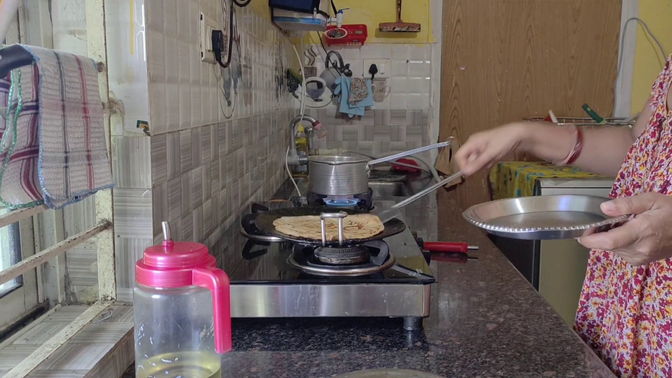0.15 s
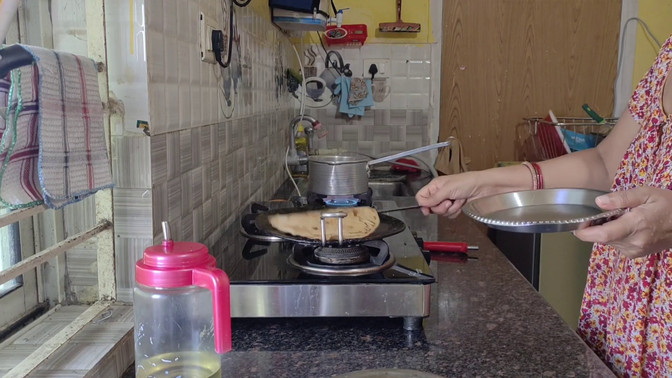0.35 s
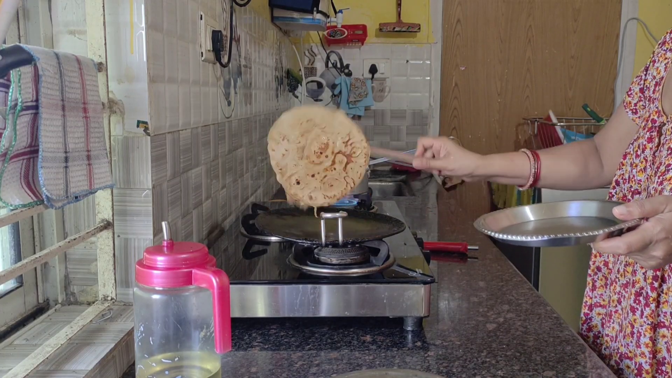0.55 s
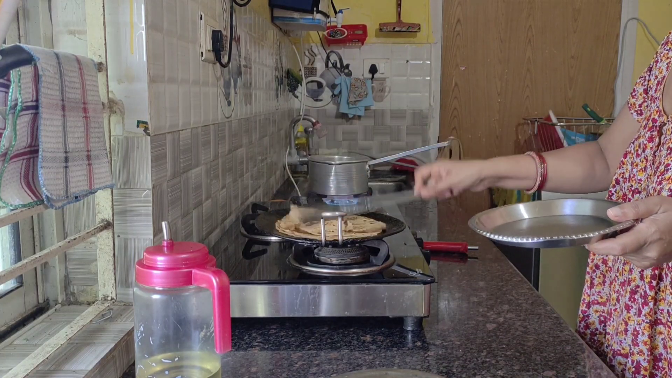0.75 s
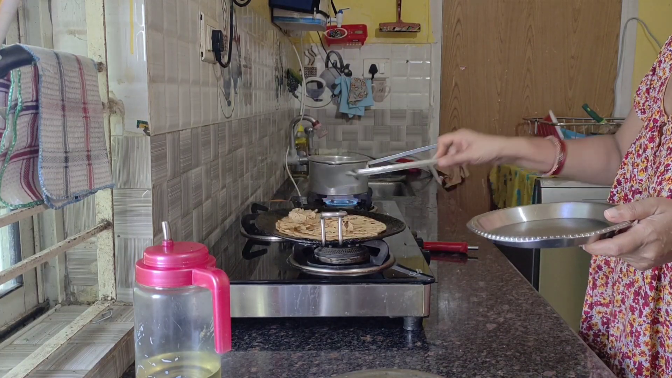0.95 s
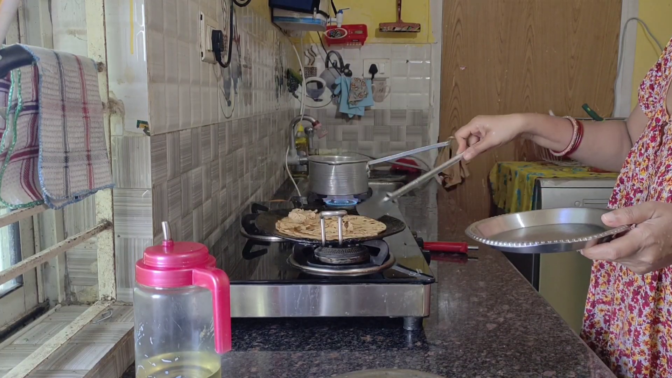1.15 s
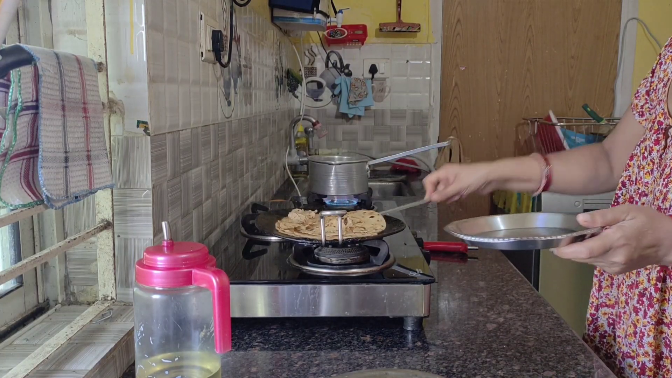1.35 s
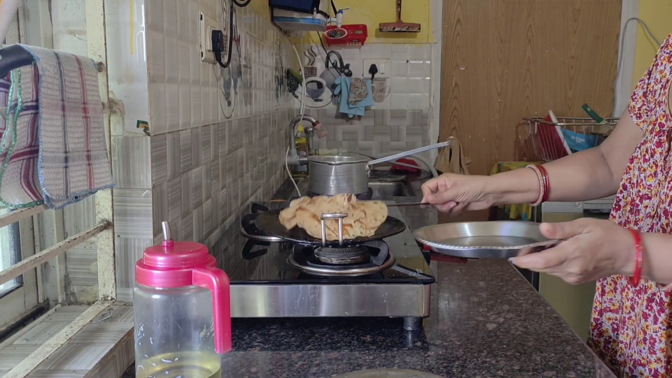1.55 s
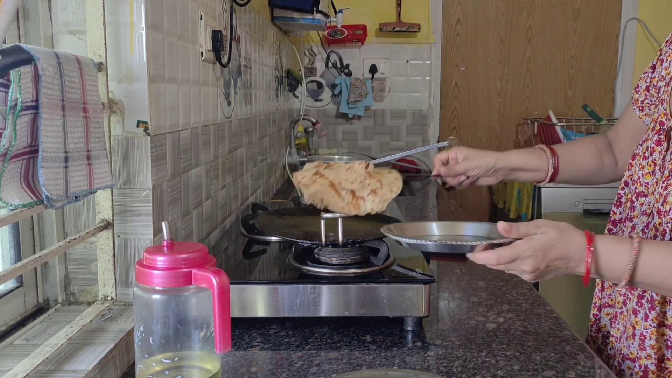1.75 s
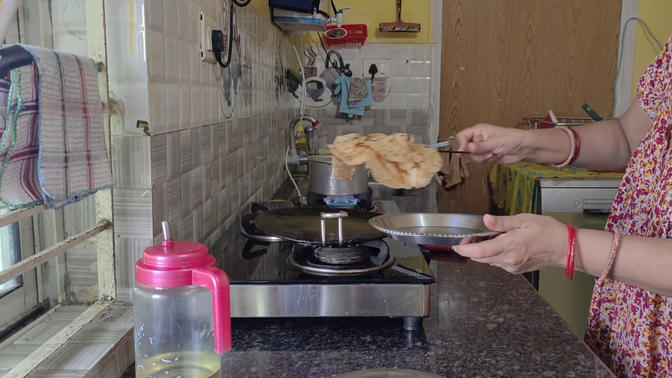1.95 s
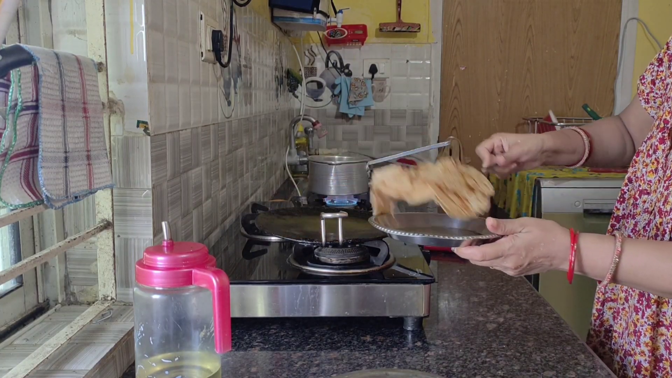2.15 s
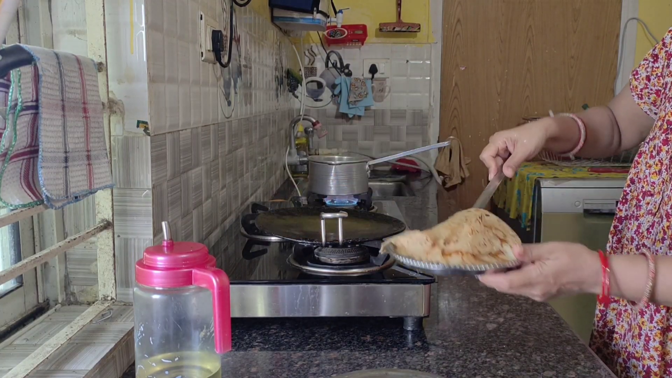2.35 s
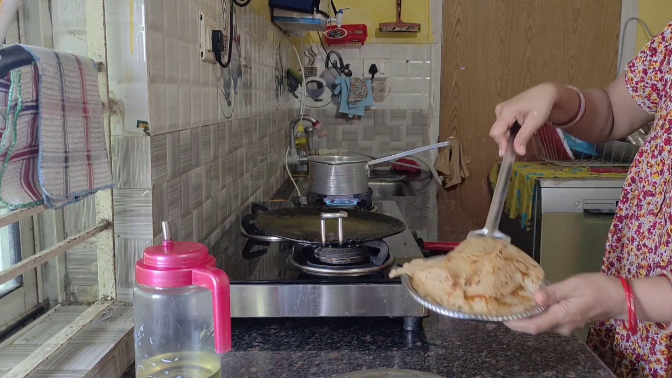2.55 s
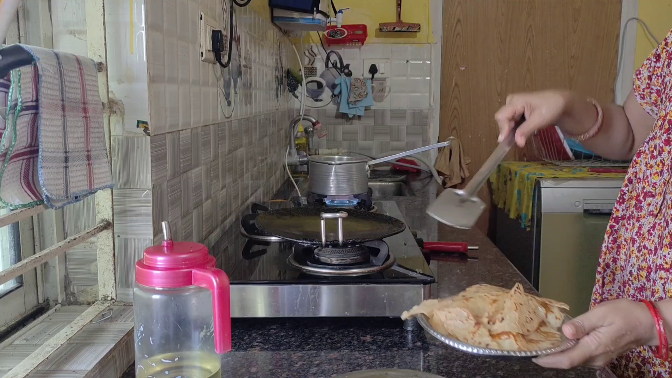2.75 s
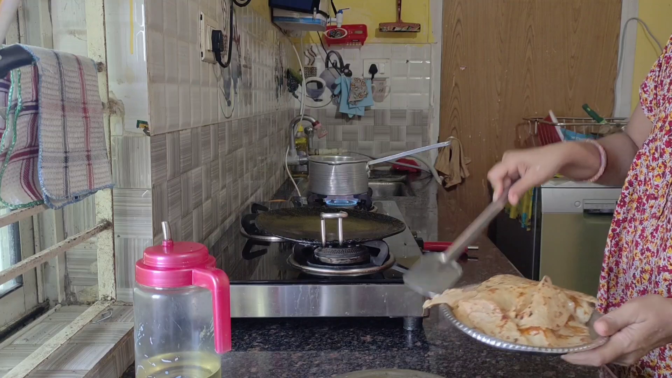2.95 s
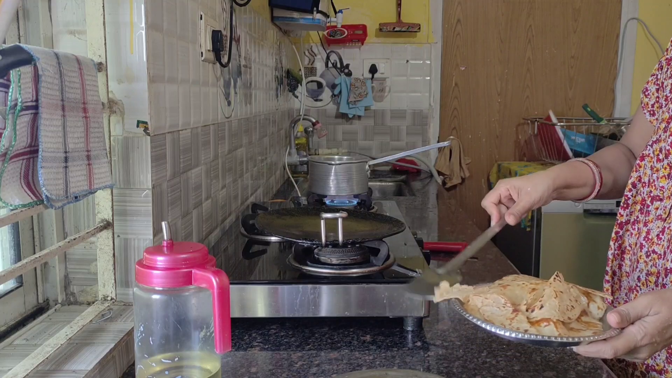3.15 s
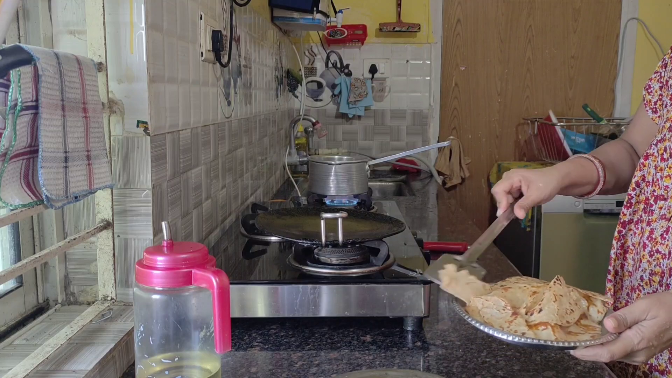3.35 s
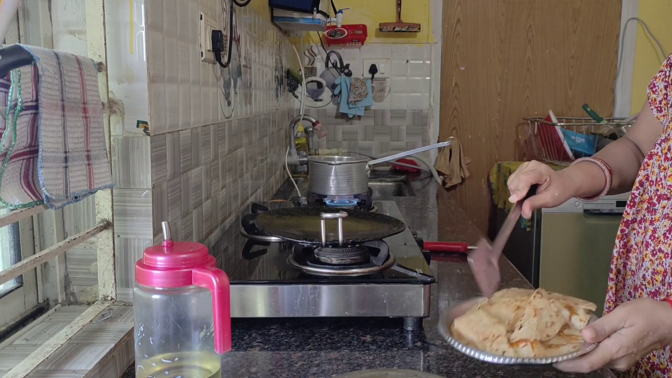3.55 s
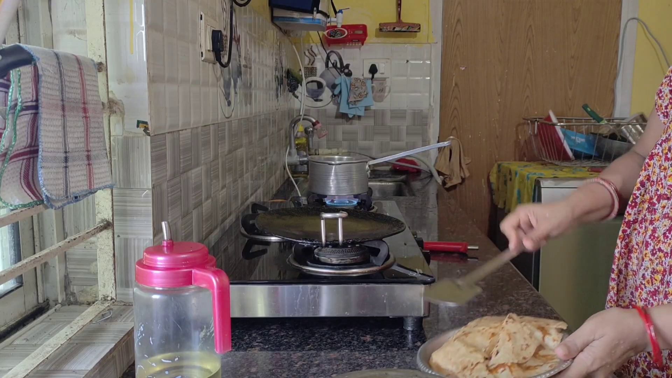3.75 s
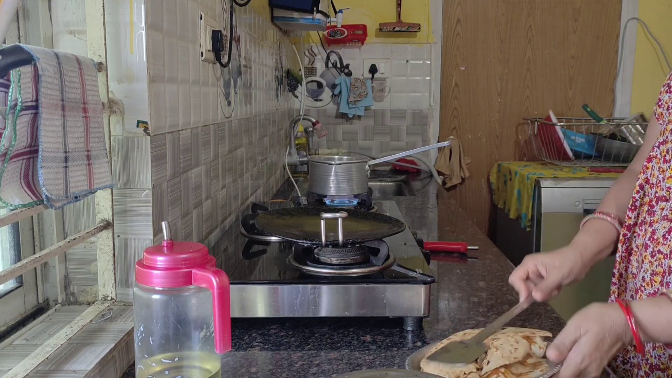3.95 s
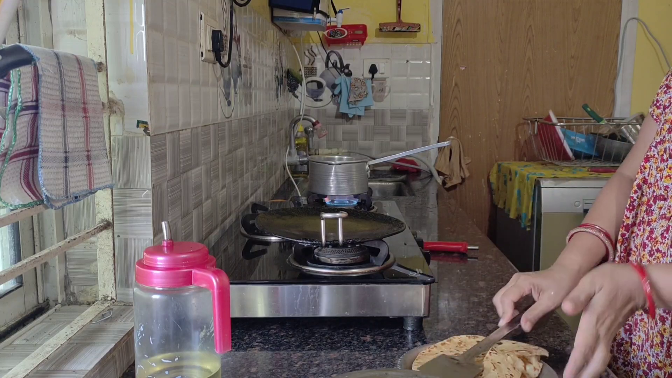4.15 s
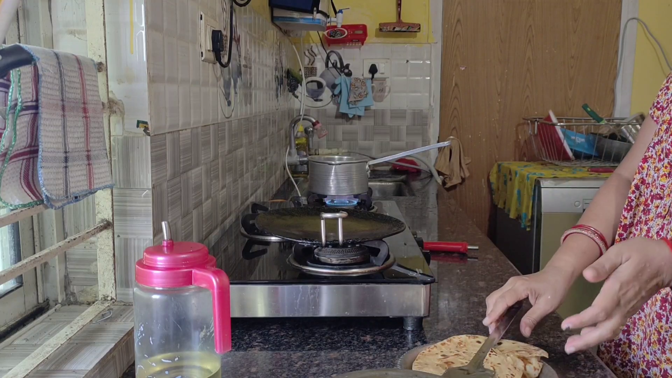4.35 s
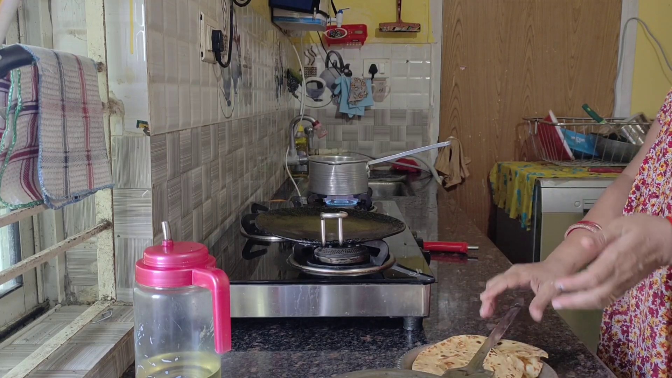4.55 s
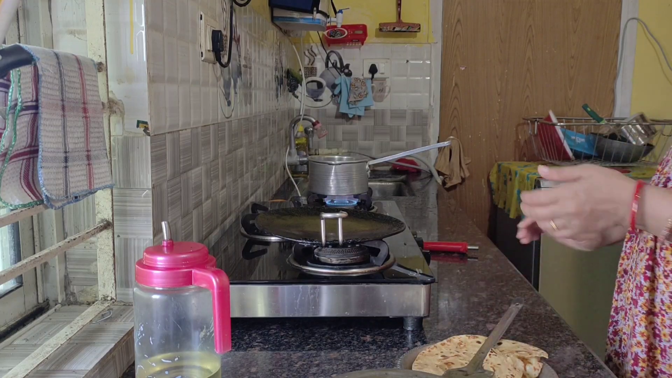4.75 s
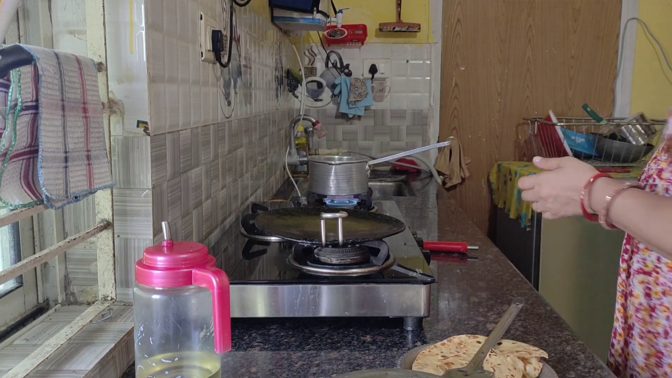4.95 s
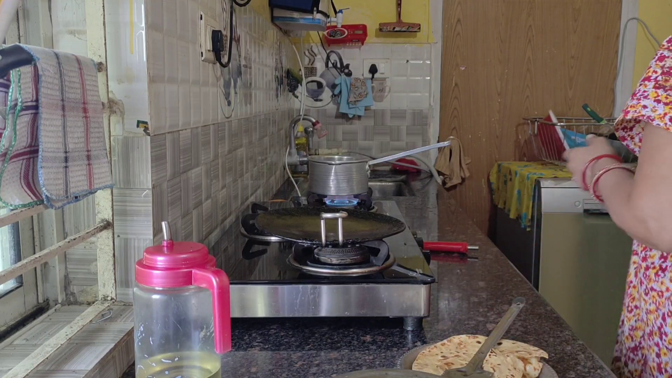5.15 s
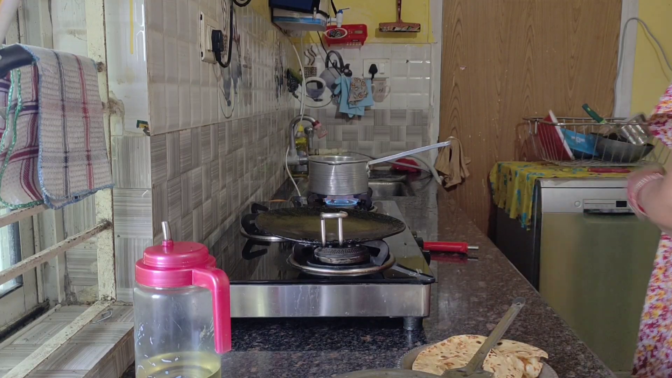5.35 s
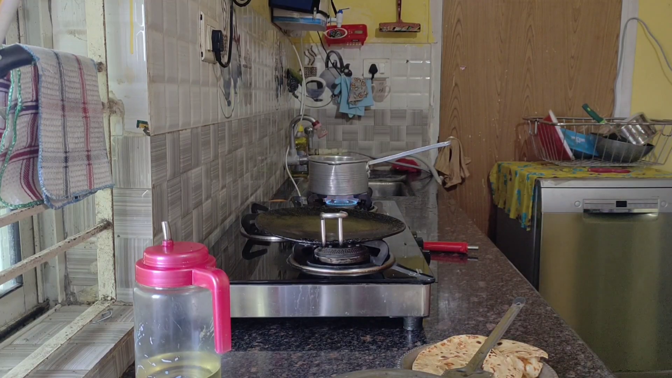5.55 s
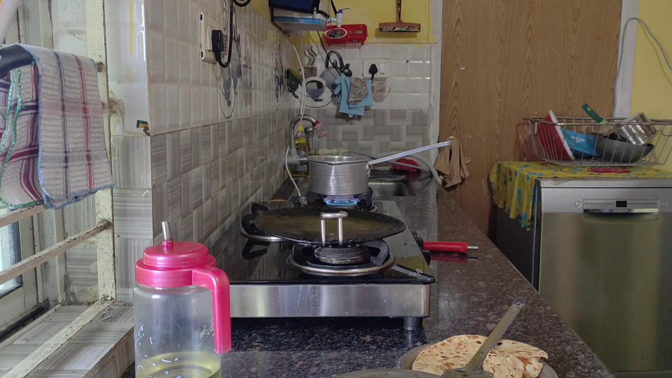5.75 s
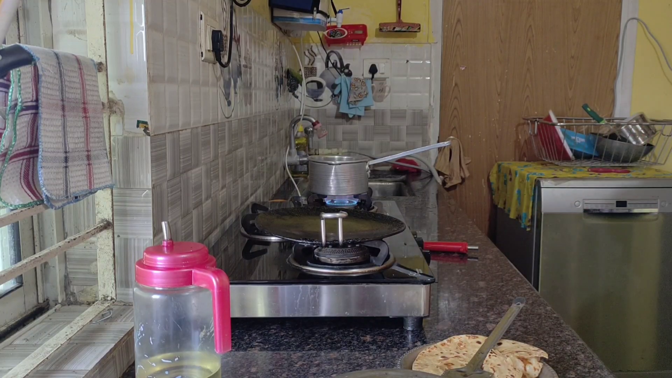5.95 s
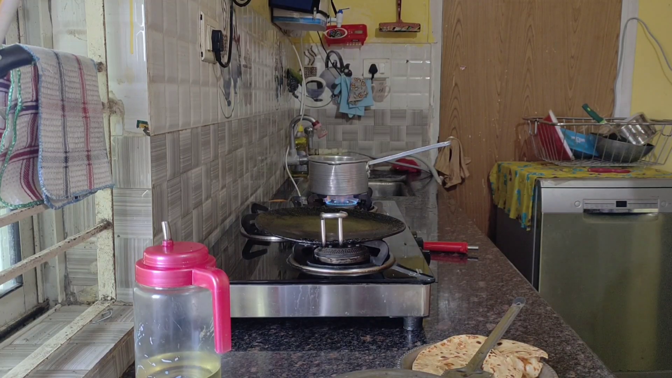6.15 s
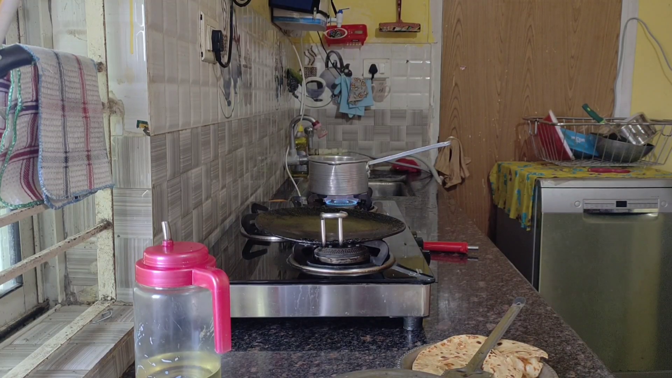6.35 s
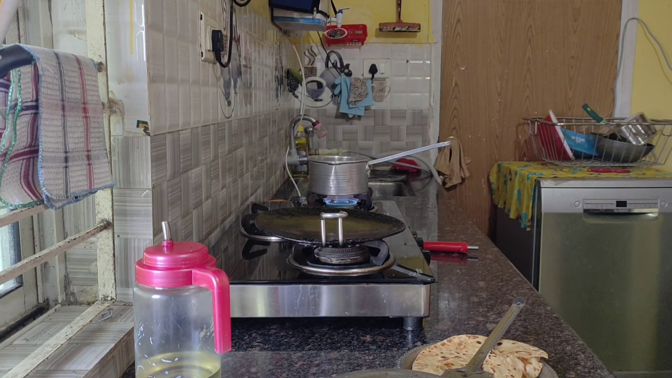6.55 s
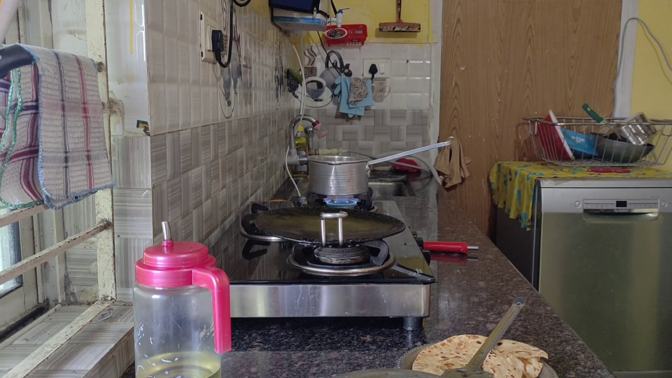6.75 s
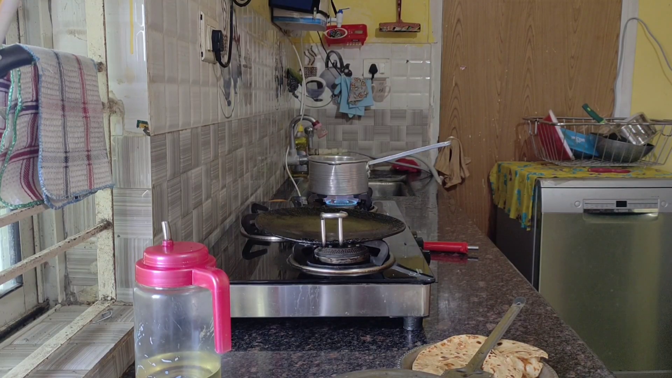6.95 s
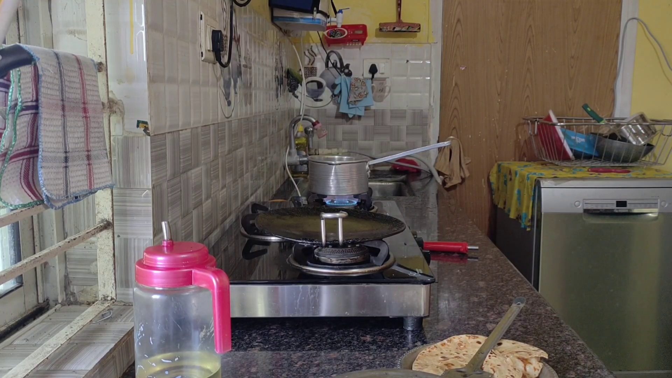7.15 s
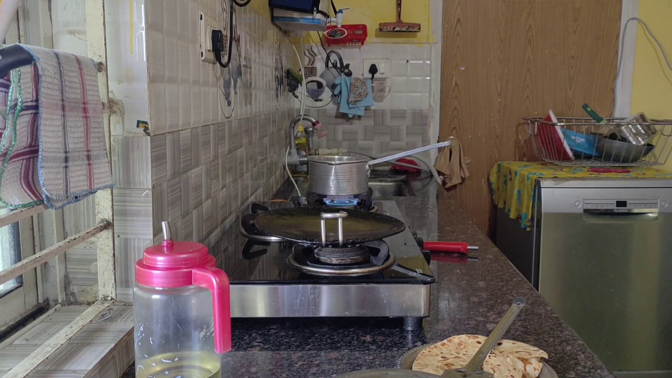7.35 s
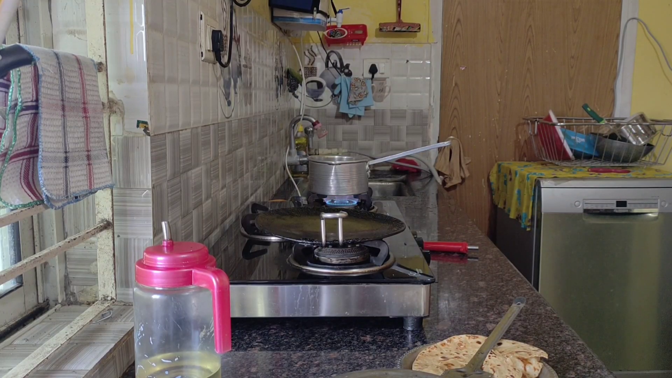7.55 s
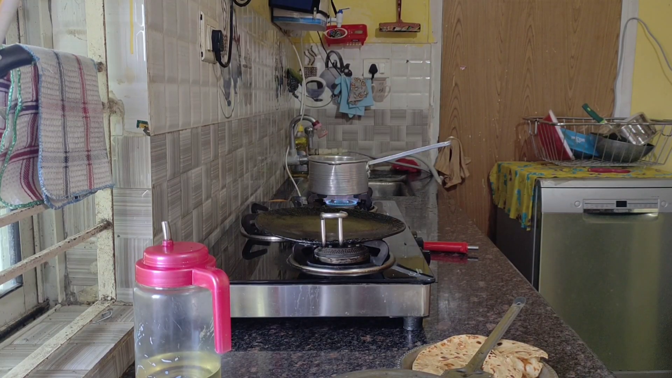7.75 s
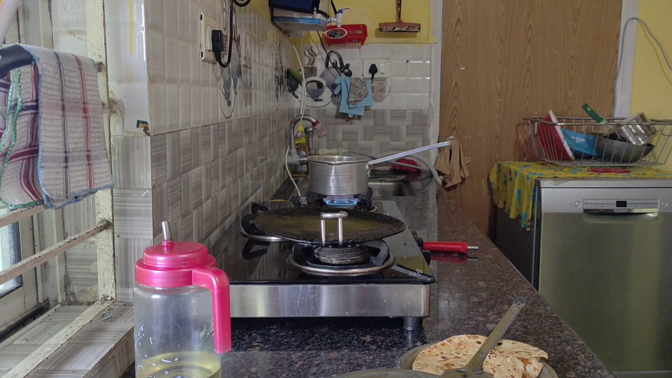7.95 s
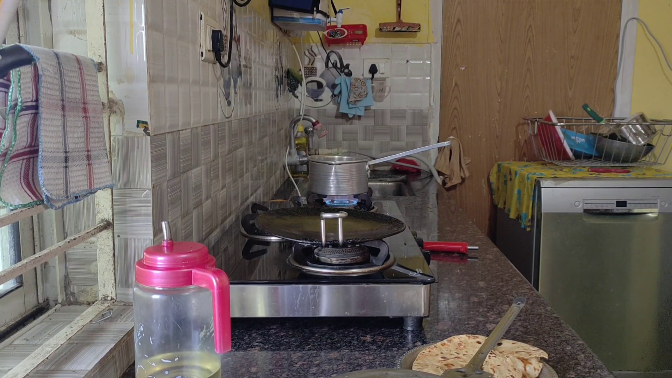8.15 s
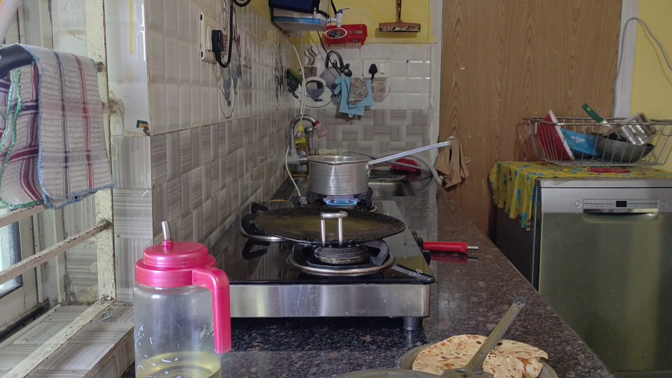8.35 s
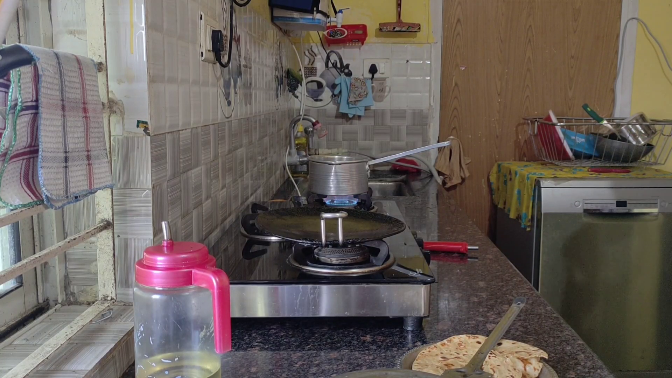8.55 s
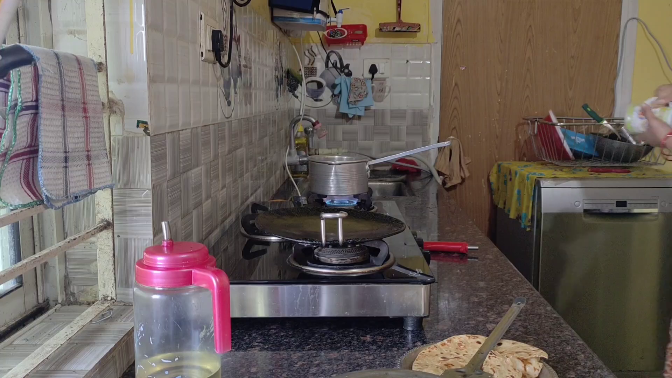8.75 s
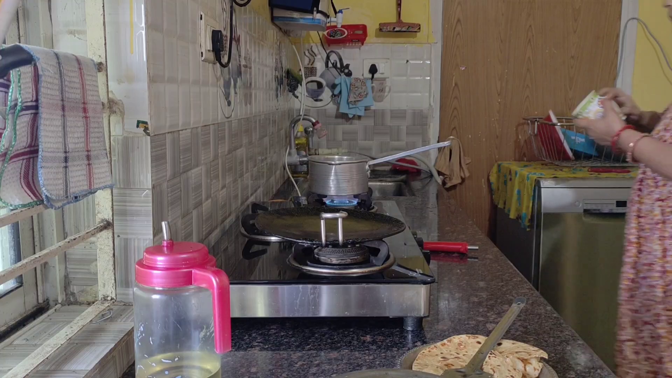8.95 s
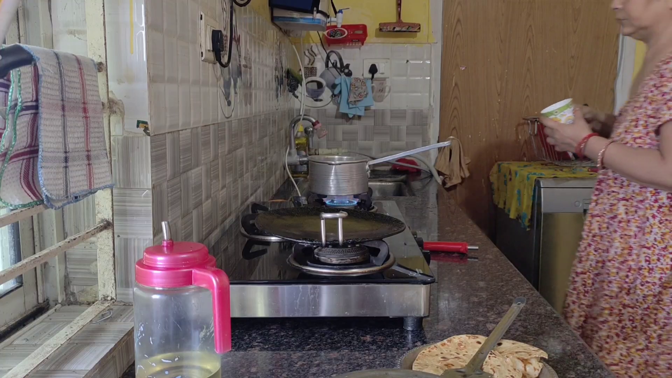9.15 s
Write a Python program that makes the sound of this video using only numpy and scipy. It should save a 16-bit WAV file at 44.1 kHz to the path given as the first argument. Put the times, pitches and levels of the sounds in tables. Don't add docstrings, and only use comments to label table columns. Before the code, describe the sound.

Close in a small tiled kitchen, a steel spatula scrapes and knocks on an iron griddle, with one sharp clack early. It clinks on a thin plate, then the plate lands on the stone counter with a double clatter. Slippers shuffle away, a lid knocks out of sight, a steel cup rings twice, and shuffling returns. Fridge hum and gas hiss continue; stereo microphones stand back and pick up much of the room.

```python
import sys
import numpy as np
from scipy import signal
from scipy.fft import rfft, irfft, next_fast_len
from scipy.io import wavfile
from scipy.ndimage import map_coordinates

SR = 44100
rng = np.random.default_rng(int(sys.argv[2]) if len(sys.argv) > 2 else 0)


def gain_from_db(level_db):
    decades = np.asarray(level_db, float) / 20
    return 10 ** decades


def store_wav(level_fs):
    pcm = np.round(np.clip(np.atleast_2d(level_fs), -1, 1) * 32767)
    wavfile.write(sys.argv[1], SR, pcm.T.astype(np.int16))


N = 406161

# start_s, clack_db, heft_db (knock re clack), direct_click (x room)
GRIDDLE_TAPS = [(.015, -30.5, -36, 2.7), (.146, -46.5, 13, 9.5), (.5, -38, 9, 3), (.293, -34, -20, 5),
                (.518, -41, -20, 4.054), (.565, -50, 17.5, 4.68), (.828, -26, 4, 5), (.8512, -12, -22, 11),
                (.9294, -42, 10.5, 8), (.966, -32.5, 16, 13), (1.045, -43, 18.5, 8), (1.079, -29.5, 3, 9.3),
                (1.212, -52, 21.5, 5.5), (1.231, -19, -2.5, 11.04), (1.376, -44, 15, 5.8),
                (1.407, -25, -11, 5), (1.585, -36, 9.5, 4.09), (1.61, -35.5, -6, 5), (1.669, -49, 17, 4),
                (1.735, -55, 15, 3)]
PLATE_TAPS = [
    (1.904, -60.5, -39, 5),
    (2.4735, -24, -3, 6.5),
    (2.6747, -28, -23, 7),
    (3.585, -50, -14.5, 2.1),
]
# full_pressure_s, rasp_db, rise_s (over 30 dB), hold_s, heft_db (knock re rasp)
SLIDES = [(.045, -43.5, 0.3, 0.031, -49), (.25, -48, .08, .04, -8), (.294, -35, .012, .03, -25),
          (.343, -32, 0.1, 0.008, -21.5), (.375, -33, .06, .035, -20), (.53, -52, 0.3068, 0.04487, -10),
          (.82, -46.5, 0.14, 0.013, -32), (.87, -45, 0.015, 0.044, 6), (1.0, -61, 0.02, 0.043, 10.5),
          (1.36, -39, .1, .04, -16), (1.408, -30, 0.015, 0.02, -16), (1.46, -34.5, .07, .02, -16),
          (1.6, -50, .06, 0.043, -2), (2.52, -42.5, 0.115, 0.13357, -54), (2.69, -52, .08, 0.013, -28)]
# start_s, clack_db, thump_db (re clack), sizzle_db (re clack), rattle_s
SET_DOWN = [
    (3.931, -32, -10, -12, .006),
    (3.939, -6.5, -23, -5, 0.016),
    (3.966, -11, -25, -6, .006),
    (4.2161, -6.5, -29.5, -8, 0.017),
    (4.2255, -9.5, -8.5, -1, 0.017),
]
# start_s, clack_db, thump_db, knock_db (both re clack), rattle_s
BLOWS = [(1.264, -40.5, 20.5, -10.5, 0.02587), (5.024, -35, 0.5, -23, 0.03), (5.4935, -37, -0.5, -6, 0.02),
         (5.678, -34.5, -29.5, -1, 0.0237), (6.384, -34, 0, -3, .008), (6.394, -21, -8, -5, 0.012),
         (6.6793, -24, -5, -5, 0.01698), (6.737, -33.5, 11, 3.5, 0.014), (6.819, -32.5, 9, -1, .012),
         (6.8594, -39, 21, -26, 0.036), (7.716, -32, 0, -6, .01), (7.725, -23, 6, -1, 0.05),
         (9.12, -29.5, 3, 4.5, 0.011)]
# full_pressure_s, rasp_db, rise_s (over 30 dB), hold_s, heft_db (knock re rasp)
SHUFFLES = [(3.1, -68, .3, .3, -3), (5.25, -66, .2, .15, -6), (6.155, -44, .05, .02, -14),
            (3.56, -68, .15, 0.1882, -3), (5.05, -60.5, .05, 0.12, -6), (5.52, -53, 0.22, 0.13, -16),
            (5.68, -33, 0.17, 0.0056, -8), (6.01, -47, 0.054, 0.028, -56), (6.04, -43, 0.08, 0.09, -12.5),
            (6.46, -56, .05, 0.056, -5), (6.56, -64.5, .1, 0.12, 1), (6.85, -48.5, .1, 0.076, -30),
            (7.06, -50.5, 0.24, 0.028, -23), (7.26, -41.5, 0.17, 0.026, -15), (7.33, -49, .1, 0.088, 0),
            (7.92, -46, 0.087, 0.041, -12), (8.01, -51, .06, 0.051, -12), (8.31, -63, 0.3227, 0.023, -3),
            (8.38, -55, .03, 0.034, -24), (8.43, -40.5, 0.11, 0.081, -12.5),
            (8.85, -50.5, 0.063, 0.039, -38), (8.9, -46, 0.16, 0.093, -14.5),
            (9.02, -44.5, 0.026, .07, -26), (9.135, -44, 0.0639, 0.004, -7.5)]

# pitch_hz, t60_s, then level_db struck on the side, on the rim, settling on its base
CUP_HZ = [232, 1157, 1278, 1949, 2182, 2440, 3110, 3755, 5220, 5599, 6342, 6655, 6966, 7477, 7936, 8140,
          9238, 10430, 12490, 13320, 13750]
CUP_T60 = [.6, 0.56, .3, 0.7, 0.32, 0.38, .5, 0.33, 0.28, .3, 0.23, 0.26, .22, 0.3006, .3, 0.1267, 0.051,
           0.23, 0.23, .22, 0.14]
SIDE_DB = [-26, -16, -9, -12, -18, -6, -10, -3, 1, -7, -12, -2, -3, -11.5, 0, -6, 3, -5, -9, -10, -7]
RIM_DB = [-20, -12, -9, -39.5, -7.5, -10, -1, -2, -7, -3.5, -6, -9, -31, -14.5, -18, -6.5, -3, -22.5, -28,
          -24, -24]
BASE_DB = [-20, 2, -10, -30, -6, -9, -2, -1, -7, -7, -9, -9, -30, -15, -18, -14, -14, -22, -28, -24, -24]
CUP_SIDE = np.transpose([CUP_HZ, SIDE_DB, CUP_T60])
CUP_RIM = np.transpose([CUP_HZ, RIM_DB, CUP_T60])
CUP_BASE = np.transpose([CUP_HZ, BASE_DB, CUP_T60])
# pitch_hz, level_db, t60_s
PLATE = [(480, -4, .07), (748, 0, .09), (1256, -8, .08), (1534, -9, .1), (1873, -1, .1), (2800, 0, .07),
         (3015, -6, .15), (3720, -8, .12), (5582, -12, .15), (7052, -8, .15), (8753, -11, .15),
         (10020, -8, .14), (10990, -6, .15), (12690, -9, .1)]
# pitch_hz, level_db, t60_s
RESTRIKE = [(808, -4, .08), (2804, -1, .12), (3240, 1, .04), (4340, -6, .06), (5030, -10, .25),
            (5300, -9, .06), (7480, -7, .06), (8834, -10, .07), (11150, -8, .06)]
# pitch_hz, level_db, t60_s
GRIDDLE = [(2288, -10, .1), (3295, -8, .08), (4172, -7, .2), (4716, -8, .2), (5868, -1, .12),
           (6250, -7, .1), (7000, -8, .08), (7779, -10, .1), (8312, -3, .07), (10340, -10, .1),
           (10980, -12, .09), (12100, -18, .1)]
# pitch_hz, level_db, t60_s
LID = [(1400, -9, .1), (2970, -6, .1), (3327, 0, .17), (3490, -2, .06), (4242, -9, .2), (5604, -4, .15),
       (6115, -8, .16), (7058, -9, .2), (7763, -4, .11), (8629, -13, .2), (9981, -14, .2), (10720, -11, .2),
       (11280, -13, .11), (13230, -22, .15)]
# pitch_hz, level_db, t60_s
SPATULA = [ (2780, -14, .2), (3025, -2, .3), (3440, 4, .05), (3620, 0, .04), (4366, -6, .3), (5443, -4, .3),
           (6200, -10, .2), (6729, -7, .11), (7418, -6, .24), (7967, -12, .29), (8915, -10, .3),
           (11130, -14, .3), (11550, -12, .3), (14150, -16, .2)]
# pitch_hz, level_db, t60_s
SEATING = [(830, -1, .1), (1900, -8, .08), (3036, -2, .25), (3400, 2, .15), (4300, -8, .15),
           (6099, -13, .2), (6578, -12, .12), (7800, -17, .15)]
# pitch_hz, level_db, t60_s
STAND = [(420, -3.5, 0.7), (543, -5, 0.53), (666, -3.5, 0.68), (1255.4, -0.5, 0.067), (1390, -22.5, 0.095)]
# start_s, object, level_db, rattle_s, grip_t60_s (longest the grip allows)
RINGS = [(0.015, SPATULA, -46, .06, .06), (0.15, STAND, -41, 0.03, .6), (0.502, STAND, -48, .0075, .091),
         (.519, GRIDDLE, -48, .005, .06), (1.079, GRIDDLE, -40, 0.005, 0.061),
         (1.2315, GRIDDLE, -30.5, 0.0027, .12), (1.609, GRIDDLE, -40, 0.00735, 0.08),
         (2.279, SPATULA, -33, .02, .05), (2.325, SPATULA, -43, 0.04, 0.07),
         (2.4725, PLATE, -20, 0.012, 0.09), (2.675, RESTRIKE, -27, 0.03, 0.25),
         (3.939, SEATING, -20, .018, 0.2), (3.966, SEATING, -24, .006, .2), (6.679, LID, -24, 0.022, 0.12),
         (7.099, CUP_SIDE, -20, 0.04, .35), (7.16, CUP_SIDE, -26, .04, .3),
         (7.762, CUP_RIM, -16.5, 0.012, 0.33), (7.776, CUP_BASE, -17, .05, .33)]

# pitch_hz, level_db (per Hz)
TAP = [(180, -48), (300, -20.5), (801, -4), (1170, -13.5), (2480, -2), (3130, -1.5), (6200, -19.5),
       (11300, -8), (14700, -10), (16000, -32)]
# pitch_hz, level_db (per Hz)
RASP = [(180, -46.5), (300, -43.5), (366, -12), (1210, -6), (1320, -2.5), (3700, -2), (4440, -12),
        (5160, -7.5), (6100, -9), (12100, -6.5), (16000, -6.5)]
# pitch_hz, level_db (per Hz)
CLACK = [(71, -44), (120, -8.5), (473, -26.5), (742, -13), (1620, -13), (3110, -6), (4780, -23.5),
         (16000, -24)]
# pitch_hz, level_db (per Hz)
SCUFF = [(71, -29), (120, -7), (177, -1), (445, -23), (805, -6), (892, -13.5), (1340, -11), (2750, -11),
         (10200, -23), (11800, -19.5), (16000, -24.5)]
# pitch_hz, level_db (per Hz)
HUM = [(15, -51.5), (25, -29), (69, -12), (80, -12), (102, -1.5), (130, 0.5), (267, -13.5), (295, -24.5),
       (406, -23), (448, -30.5), (700, -37.5), (910, -76), (1540, -120)]
# pitch_hz, level_db (per Hz)
HISS = [(180, -15), (300, -11.5), (440, -9), (614, -9.5), (678, -6.5), (1080, -14), (2140, -19.5),
        (2250, -17), (2650, -15.5), (4230, -25), (6850, -24.5), (8790, -27), (10400, -18.5), (11900, -26.5),
        (16000, -23.5)]
# pitch_hz, width_hz, level_db
PAN = [(760, 160, 5), (2450, 300, -3), (3100, 350, -1), (5850, 150, 0), (7000, 200, -3)]
# pitch_hz, width_hz, level_db
IRON = [(732, 157.08, 5), (1730, 44, -9), (2100, 42, -2), (3140, 130, -3.5), (3767, 72, 0), (5100, 61, 4.5),
        (5400, 50, 8), (6900, 120, 6), (7770, 75, 5), (2710, 105, -5)]
# pitch_hz, width_hz, level_db
STONE = [(778, 97, 12), (3165, 170, 6), (3320, 180, 5), (4305, 140, 5.5), (5810, 200, -16),
         (6800, 200, -7.5)]
# pitch_hz, width_hz, level_db
JET = [(10350, 300, -3)]
# centre_s, level_db, pitch_hz, length_s
BOOMS = [(.9, -44, 192, 0.1075), (2.2, -61.5, 44.7, 0.205), (3.75, -61, 45, .2), (6.41, -41.5, 163, .05),
         (6.85, -36.5, 175, 0.07247), (7.28, -45.5, 227.4, 0.22), (9.05, -54, 51.8, 0.38)]
# pitch_hz, t60_s
KITCHEN = [(150, 0.3), (800, 0.31), (3000, 0.36116), (8000, 0.28123), (15000, 0.29)]
EDGES_HZ = [130, 350, 1300, 5000, 16000]
# pitch_hz, side_db (re mid)
WIDTH = [(60, -15.5), (110, -24), (200, -8.5), (380, -0.5), (700, 0.5), (1290, 3), (2380, -3.5),
         (4400, -3.5), (8120, 3.5), (15000, -3)]


def unit(x):
    return x / np.sqrt(np.mean(np.abs(x) ** 2) + 1e-20)


def along(points, hz):
    f, v = np.transpose(points)
    return np.interp(np.log(hz + 1), np.log(f + 1), v)


def wobble(rate):
    knots = rng.standard_normal(int(N * rate / SR) + 4)
    return map_coordinates(knots, [np.arange(N) * rate / SR])


def filtered(x, response):
    m = next_fast_len(x.shape[-1] + 8192)
    return irfft(rfft(x, m) * response(np.fft.rfftfreq(m, 1 / SR)), m)[..., :x.shape[-1]]


def resonant(peaks):
    return lambda hz: 1 + sum(gain_from_db(db) * 1j * hz * w / (c * c - hz * hz + 1j * hz * w) for c, w, db in peaks)


def registers(spectrum, hz):
    above = [1 / (1 + (edge / (hz + 1)) ** 8) for edge in EDGES_HZ]
    colour = gain_from_db(along(spectrum, hz))
    return [unit(colour * np.sqrt(np.abs(low - high))) for low, high in zip(above, above[1:])]


def add(bus, s, x):
    part = bus[:, round(s * SR):][:, :x.shape[1]]
    part += x[:, :part.shape[1]]


def echo(colour, speed=1, direct=6, build=0.00067):
    noise = rng.standard_normal((2, 2 * SR // 5))
    noise *= 1 - np.exp(-np.arange(noise.shape[1]) / SR / build)
    noise[:, 128] = [direct, direct / 2]
    hz, t, z = signal.stft(noise, SR, nperseg=256)
    decay = gain_from_db(-60 * speed * t / along(KITCHEN, hz)[:, None])
    tail = signal.istft(z * colour(hz)[:, None] * decay, SR, nperseg=256)[1][:, 100:]
    return tail * np.minimum(np.arange(tail.shape[1]) / 24, 1)


def rattle(length):
    t = np.arange(SR // 5) / SR
    bounces = rng.standard_normal(len(t)) ** 3 / np.sqrt(15 * length * SR + 1)
    burst = bounces * np.exp(-(t / length) ** 4)
    burst[0] = 0.8
    return burst / np.linalg.norm(burst)


def blows(rows, direct, spectrum, gain_db, build):
    bus = np.zeros((2, N))
    for (s, db, *rel_db, length), click in zip(rows, np.broadcast_to(direct, len(rows))):
        shares = gain_from_db([*rel_db[:-1], 0, rel_db[-1]])
        answer = echo(lambda hz: shares @ registers(spectrum, hz)[-len(shares):], direct=click, build=build)
        contact = signal.fftconvolve(answer, rattle(length)[None], axes=1)
        add(bus, s - .001, gain_from_db(db + gain_db) * contact)
    return bus


def friction(strokes, spectrum, body, fall_db_per_s, sizzle_db, dulling, grain_db, t60, arch=np.inf):
    grains = rng.standard_normal(N) * gain_from_db(grain_db * np.clip(wobble(900), -2, 2) + 1.5 * wobble(40))
    travel_s = .045
    bus, hop, after = np.zeros((2, N)), round(travel_s * SR), np.arange(SR // 12) / SR
    for s, db, rise, hold, heft_db in strokes:
        first = max(round((s - 1.5 * rise) * SR), 0)
        span = np.arange(first, min(round((s + hold + .25) * SR), N))
        t = span / SR - s
        rasp_db = db + 30 * np.minimum(t / rise, 0) - fall_db_per_s * np.maximum(t - hold, 0)
        bands = filtered(grains[span], lambda hz: np.array(registers(spectrum, hz)[1:]) * body(hz))
        pitch = 1 / (1 + ((t - hold / 2) / arch) ** 2)
        bands = [np.interp(np.cumsum(pitch), np.arange(len(t)), band) for band in bands]
        shares_db = [heft_db, 0, sizzle_db - dulling * heft_db]
        stroke = gain_from_db(rasp_db) * sum(gain_from_db(share_db) * unit(band) for share_db, band in zip(shares_db, bands))
        padded = np.pad(stroke, (hop, 2 * hop))
        pieces = np.lib.stride_tricks.sliding_window_view(padded, 2 * hop)[::hop] * np.sqrt(np.hanning(2 * hop))
        answers = rng.standard_normal((2, len(pieces), len(after))) * gain_from_db(-60 * after / t60)
        answers[:, :, 0] = [[6], [3]]
        answers /= np.linalg.norm(answers[0], axis=1)[:, None]
        wet = signal.fftconvolve(answers, pieces[None], axes=2)
        for k in range(len(pieces)):
            add(bus, (span[0] + k * hop) / SR, wet[:, k])
    return np.pad(bus[:, hop:], ((0, 0), (0, hop)))


def spatula():
    rows, direct = [], []
    for taps, sizzle_db in [(GRIDDLE_TAPS, -17.5), (PLATE_TAPS, -2)]:
        for s, db, heft_db, click in taps:
            rows.append((s, db, heft_db, sizzle_db - .6 * heft_db, 0.0058))
            direct.append(click)
    taps = blows(rows, direct, TAP, gain_db=-14, build=0.0015)
    slides = friction(SLIDES, RASP, resonant(IRON), fall_db_per_s=188, sizzle_db=-8.5, dulling=0.076,
                      grain_db=4, t60=.08, arch=.42)
    return filtered(taps, resonant(PAN)) + slides


def plate():
    knock_db = -5
    rows = [(s, db, thump_db, knock_db, sizzle_db, length) for s, db, thump_db, sizzle_db, length in SET_DOWN]
    return filtered(blows(rows, 2.5, CLACK, gain_db=-13.5, build=0.0025), resonant(STONE))


def rings():
    bus, m = np.zeros((2, N)), 2 ** 15
    jw = 2j * np.pi * np.fft.rfftfreq(m, 1 / SR)
    for s, modes, db, length, grip_t60 in RINGS:
        crowd_db = -30 if modes is STAND else -16
        crowd_hz = 2600 + 12900 * rng.random(size=24) ** 1.4
        crowd = [(hz, crowd_db + rng.normal(0, 3.95), .06) for hz in crowd_hz]
        hz, level_db, t60 = np.transpose([*modes, *crowd])[:, :, None]
        damped = (jw + np.log(1000) / np.minimum(t60, grip_t60)) ** 2
        w = 2 * np.pi * hz
        twin = w * (1 + 0.0036)
        ring = jw / (damped + w * w) + 0.28 * jw / (damped + twin * twin)
        path = rfft(echo(np.ones_like, speed=1.24, direct=9)[:, :SR // 3], m) * rfft(rattle(length), m)
        power = np.abs(ring) ** 2
        kept = np.sqrt(power.sum(1) / (np.abs(path) ** 2 @ power.T))
        even = SR * gain_from_db(level_db[:, 0]) * kept
        add(bus, s, gain_from_db(db) * irfft((even.real @ ring) * path, m))
    return bus


def cook():
    rows = [(s, db, thump_db, knock_db, -10 - 0.24 * thump_db, length)
            for s, db, thump_db, knock_db, length in BLOWS]
    shuffles = friction(SHUFFLES, SCUFF, np.ones_like, fall_db_per_s=246.5, sizzle_db=-9, dulling=0.18,
                        grain_db=3, t60=.075)
    return blows(rows, 1.7, SCUFF, gain_db=-10.0, build=0.0042) + shuffles


def booms():
    bus, t = np.zeros((2, N)), np.arange(SR) / SR - .5
    for s, db, hz, length in BOOMS:
        w = 0.25 * hz
        noise = rng.standard_normal((2, SR))
        rumble = filtered(noise, lambda f: (f * w) ** 2 / ((hz * hz - f * f) ** 2 + (f * w) ** 2))
        add(bus, s - .5, gain_from_db(db) * unit(rumble) * np.exp(-(t / length) ** 4))
    return bus


def background():
    t = np.arange(N) / SR
    lifted_s, cooling_s = 2.3, 0.1
    hiss_db = -57 + 2 * (1 - np.tanh((t - lifted_s) / cooling_s)) / 2
    hiss_db += -3.5 * np.exp(-((t - 4.7) / .3) ** 2)
    rumble = unit(filtered(rng.standard_normal((2, N)), lambda hz: gain_from_db(along(HUM, hz))))
    mains = gain_from_db(-1.0 + 1.5 * wobble(4.3)) * np.sin(2 * np.pi * 99 * t + 1.36 * wobble(9.5))
    hum = gain_from_db(-46 + .6 * wobble(1.3)) * (rumble + mains * [[1], [0]])
    hiss = unit(filtered(rng.standard_normal((2, N)), lambda hz: gain_from_db(along(HISS, hz)) * resonant(JET)(hz)))
    return hum + gain_from_db(hiss_db + .6 * wobble(1.2)) * hiss


def stereo(pair, width):
    side = filtered(pair[1], lambda hz: gain_from_db(along(width, hz)))
    return np.array([pair[0] + side, pair[0] - side])


def scene():
    contacts = spatula() + plate() + cook() + rings()
    thinned = filtered(contacts, lambda hz: 1 / (1 + (95 / (hz + 1)) ** 6))
    return stereo(thinned + booms() + background(), WIDTH)


def roll_off(x):
    return signal.sosfilt(signal.butter(12, 16640, fs=SR, output="sos"), x)


def record(dry):
    held = dry / (1 + np.abs(dry / .85) ** 6) ** (1 / 6)
    dull = filtered(held, lambda hz: 1 / (1 + (hz / 15800) ** 80))
    return roll_off(dull)


dry = scene()
out = record(dry)
store_wav(out)
```